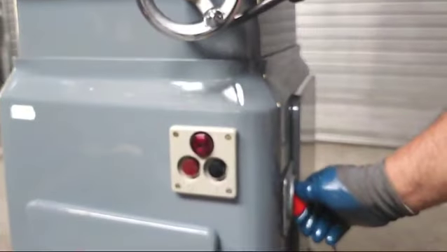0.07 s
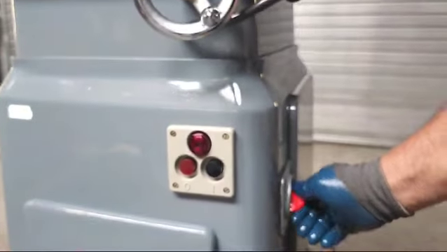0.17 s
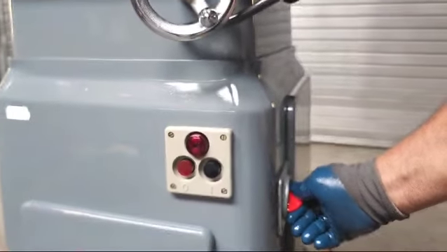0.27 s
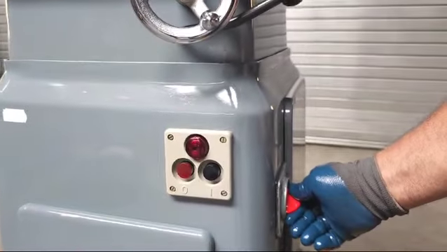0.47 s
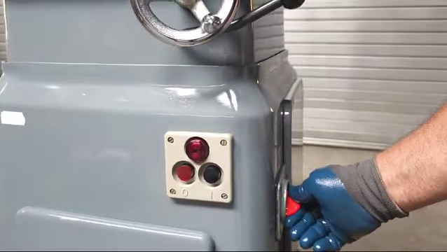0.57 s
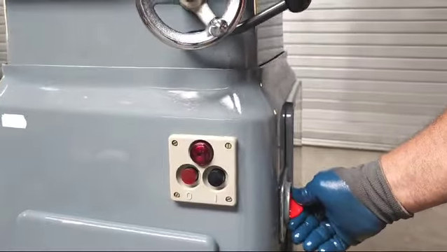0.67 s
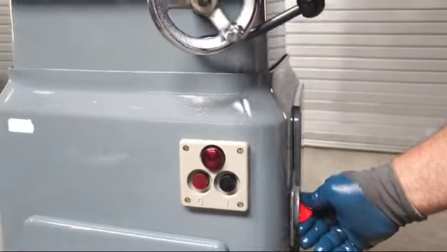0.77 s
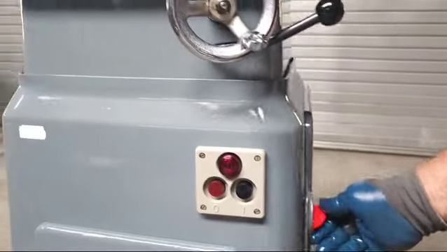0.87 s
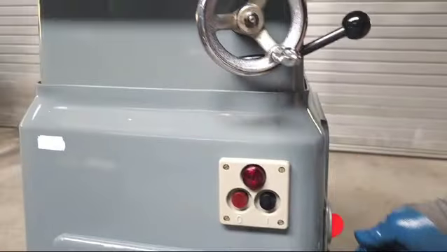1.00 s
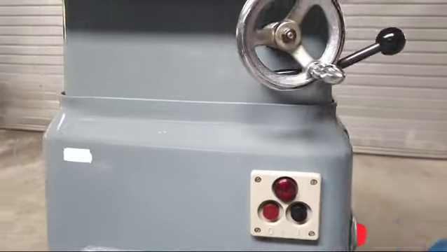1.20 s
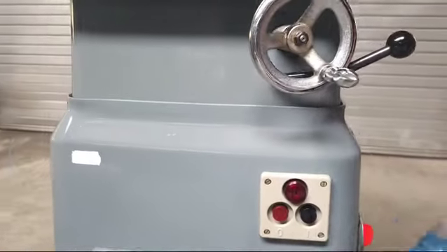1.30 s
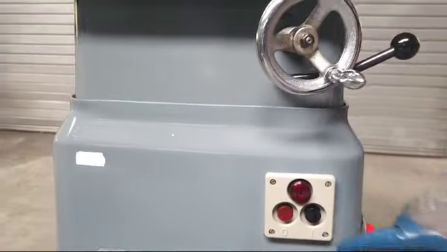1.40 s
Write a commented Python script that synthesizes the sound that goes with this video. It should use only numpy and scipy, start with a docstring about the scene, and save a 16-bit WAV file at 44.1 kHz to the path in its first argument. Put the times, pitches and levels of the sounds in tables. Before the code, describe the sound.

A rotary switch on a steel machine cabinet clacks over sharply, echoing through a bare workshop

```python
"""In a bare, echoing workshop, a rotary switch on a steel machine cabinet snaps over with a sharp clack.
Low rumble, room air and a faint tone fill the hall: shaped noise and a phase-modulated sine.
Mostly to the right, clothing rustles, something ticks and a shoe scuffs: enveloped, filtered noise.
The clack is a burst of blows through housing resonances, with decaying panel modes; noise with a
frequency-dependent decay makes the reverberation."""
import sys
import numpy as np
from scipy import signal
from scipy.fft import rfft, irfft, next_fast_len
from scipy.io import wavfile
from scipy.ndimage import map_coordinates

SR = 44100
rng = np.random.default_rng(int(sys.argv[2]) if len(sys.argv) > 2 else 0)


def linear_from_db(decibels):
    """Turn decibels (scalar or array-like) into linear amplitude factors; 0 gives 1."""
    return 10 ** (np.asarray(decibels, float) / 20)


def put_to_file(sound):
    """Save the sound as 16-bit audio at rate SR, in the file named by the first command-line argument."""
    columns = np.atleast_2d(sound).T  # one column per channel
    safe = np.clip(columns, -1, 1)
    whole_steps = np.round(safe * 32767)
    wavfile.write(sys.argv[1], SR, whole_steps.astype(np.int16))


N = 63945


def unit(x):
    """Normalisation to unit root-mean-square value."""
    return x / np.sqrt(np.mean(x ** 2) + 1e-20)


def along(points, hz):
    """Linear interpolation of (f/Hz, value) points over logarithmic frequency."""
    f, value = np.transpose(points)
    return np.interp(np.log(hz + 1), np.log(f + 1), value)


def level(rows):
    """Amplitude envelope from (t/s, level/dB) rows, practically silent before the first."""
    s, db = np.transpose(rows)
    return linear_from_db(np.interp(np.arange(N) / SR, s, db, left=-150))


def wobble(rate):
    """Slow random fluctuation: a spline through random knots, rate knots a second."""
    knots = rng.standard_normal(int(N * rate / SR) + 4)
    return map_coordinates(knots, [np.arange(N) * rate / SR])


def filtered(x, response):
    """Linear filtering: the spectrum is multiplied by a response of frequency."""
    m = next_fast_len(N + SR // 2)
    return irfft(rfft(x, m) * response(np.fft.rfftfreq(m, 1 / SR)), m)[..., :N]


def resonant(x, peaks):
    """Parallel resonators, each applied twice: a soft start and dark valleys between the peaks."""
    def response(f):
        total = 0
        for centre, width, db in peaks:
            once = 1j * f * width / (centre * centre - f * f + 1j * f * width)
            total = total + linear_from_db(db) * once ** 2
        return total
    return filtered(x, response)


def sides(db):
    """Stereo level difference: left and right gains whose ratio is db."""
    return linear_from_db(np.array([db / 2, -db / 2]))


def grit(grain_db):
    """Friction noise: random noise made of uneven grains."""
    return unit(rng.standard_normal(N) * linear_from_db(grain_db * wobble(400)))


# correlation of the left and right sound in the hall: (f/Hz, likeness 0-1)
LIKENESS = [(60, .996), (130, .985), (290, .92), (640, .5), (1400, .1), (15000, 0)]


def paired(spectrum):
    """Partial coherence: two noises of one spectrum, alike in the bass and independent in the treble."""
    def mid_and_side(hz):
        angle = np.arccos(np.clip(along(LIKENESS, hz), -1, 1)) / 2
        return linear_from_db(along(spectrum, hz)) * [np.cos(angle), np.sin(angle)]
    mid, side = filtered(rng.standard_normal((2, N)), mid_and_side)
    return unit(np.array([mid + side, mid - side]))


# relative spectral density of the low rumble: (f/Hz, level/dB per Hz)
RUMBLE_SPECTRUM = [(12, -39), (20, -31.5), (38, -7), (59, -2), (81, -9), (145, -16.5), (168, -18.5),
                   (216, -19), (300, -40.5), (390, -64.5), (660, -120)]
# course of the rumble: (t/s, level/dB)
RUMBLE_COURSE = [(0.0, -44), (0.156, -39.5), (0.188, -39.5), (0.54, -39.5), (0.552, -40), (0.876, -42),
                 (1.126, -40), (1.21, -45), (1.416, -42.5), (1.45, -50)]


def rumble():
    """Band-shaped noise whose level fluctuates slowly about a set course."""
    return level(RUMBLE_COURSE) * linear_from_db(0.54 * wobble(15)) * paired(RUMBLE_SPECTRUM)


# relative spectral density of the room air: (f/Hz, level/dB)
AIR_SPECTRUM = [(150, -33.5), (250, -5.5), (350, -9.5), (800, -10), (1200, -12), (2000, -17.5), (2600, -28),
                (3800, -29.5), (5000, -32.5), (6000, -39), (7500, -52), (16000, -55.5)]
AIR_DB = -56


def room_air():
    """Broadband noise falling towards the treble, with a slight drift of level."""
    return linear_from_db(AIR_DB + 0.96 * wobble(4.5)) * paired(AIR_SPECTRUM)


# rise and fall of the faint tone: (t/s, level/dB)
WHINE_COURSE = [(0, -69), (.2, -68), (.4, -78), (1.15, -75.5), (1.28, -63), (1.45, -65)]
WHINE_HZ, WHINE_WAVER_RAD = 851, 0.63


def whine():
    """Phase modulation: a faint far tone, its phase wandering separately on each side."""
    waver = WHINE_WAVER_RAD * np.array([wobble(17), wobble(15)])
    tone = np.sin(2 * np.pi * WHINE_HZ * np.arange(N) / SR + waver)
    return level(WHINE_COURSE) * unit(tone)


def background():
    """Superposition of rumble, room air and the faint tone."""
    return rumble() + room_air() + whine()


# reverberation time of the long tail: (f/Hz, t60/s)
HALL_T60 = [(200, 1.1), (600, 1.5), (1400, 1.5), (2500, 1.7), (4000, 1.79), (6000, 1.3), (9000, 0.93),
            (15000, 0.46)]
HALL_RISE_S = 0.0027
NEAR_DB, NEAR_T60_S = 14.5, 0.24  # near walls and floor answer first, over the long tail


def hall(x, colour):
    """Reverberation by convolution with noise in which each frequency dies at its own speed."""
    hz, t, z = signal.stft(paired(colour), SR, nperseg=256)
    long_tail = linear_from_db(-60 * t / along(HALL_T60, hz)[:, None])
    near_answer = linear_from_db(NEAR_DB - 60 * t / NEAR_T60_S)
    rise = 1 - np.exp(-t / HALL_RISE_S)
    tail = signal.istft(z * (long_tail + near_answer) * rise, SR, nperseg=256)[1]
    tail = tail / np.linalg.norm(tail[0])
    return signal.fftconvolve(x[None], tail, axes=1)[:, :N]


# relative colour of the hall's answer to the switch: (f/Hz, level/dB)
HALL_COLOUR = [(150, -19.5), (300, -20.5), (600, -1.5), (1300, -6), (2700, -5.5), (4500, -1), (6200, -3.5),
               (7500, -11), (10500, -17), (12500, -14), (16000, -26)]
HALL_DB, MOVE_WET_DB = -2.5, -11


def echoes(switch_send, movement_send):
    """Linearity of the room: the answers to switch and movement simply add."""
    switch_echo = linear_from_db(HALL_DB) * hall(switch_send, HALL_COLOUR)
    movement_echo = linear_from_db(MOVE_WET_DB) * hall(movement_send, [(1000, 0)])  # flat colour
    return switch_echo + movement_echo


# relative spectral density of cloth, shared by the ticks: (f/Hz, level/dB per Hz)
CLOTH_SPECTRUM = [(1500, 0.5), (4000, 6), (7500, 1), (10300, -9), (11800, -5.5), (14000, -9), (16000, -21)]


def cloth(x):
    """Spectral shaping of noise to the colour of cloth."""
    return unit(filtered(x, lambda hz: linear_from_db(along(CLOTH_SPECTRUM, hz))))


# strength of the rubbing, before the side balance: (t/s, level/dB)
RUSTLE_COURSE = [(.72, -95), (.75, -73), (.796, -60), (.836, -59.5), (.852, -69), (.886, -63.5),
                 (.934, -72.5), (1.02, -80.5), (1.29, -83), (1.312, -62.5), (1.35, -60.5), (1.385, -49.5),
                 (1.42, -54), (1.45, -60)]


def rustle():
    """Dry friction: grainy noise follows the strength of the rubbing."""
    return level(RUSTLE_COURSE) * cloth(grit(grain_db=3.0))


# ticks, before the side balance: (t/s, starting level/dB)
TICK_STARTS = [(0.637, -63), (0.8883, -61), (1.1742, -59)]
TICK_T60_S = 0.0287


def ticks():
    """Impulsive excitation: noise starts at once and decays exponentially."""
    t = np.arange(N) / SR
    envelope = 0
    for s, db in TICK_STARTS:
        decay = linear_from_db(db - 60 * np.maximum(t - s, 0) / TICK_T60_S)
        envelope = envelope + (t > s) * decay
    return cloth(rng.standard_normal(N)) * envelope


# strength of the scuff, before the side balance: (t/s, level/dB)
SCUFF_COURSE = [(1.33, -71), (1.35, -52), (1.365, -45.5), (1.385, -43), (1.408, -50), (1.425, -56),
                (1.45, -58)]
# resonances of the sole on its edge, higher: (f/Hz, width/Hz, relative level/dB)
SOLE_EDGE = [(4420, 1200, -8.5), (5870, 660, -0.5), (7000, 1200, -6), (11880, 3000, -16.5)]
# resonances of the sole once it lies flat, lower: (f/Hz, width/Hz, relative level/dB)
SOLE_FLAT = [(1830, 530, -2), (3500, 680, -1.5), (4730, 990, 1), (7500, 3100, -6.5), (11800, 2700, -10)]
FLAT_FROM_S, FLAT_BY_S = 1.36, 1.405
# resonances of the heel dragging after: (f/Hz, width/Hz, relative level/dB)
HEEL = [(1600, 350, 0), (3550, 800, -3)]
DRAG_FROM_S, DRAG_RISE_S, DRAG_DB = 1.42, 0.0096, -53
GRAIN_DB = 1.8


def scuff():
    """Friction-driven resonance: a sole slides from its edge onto its flat, then the heel drags."""
    t = np.arange(N) / SR
    flat = np.clip((t - FLAT_FROM_S) / (FLAT_BY_S - FLAT_FROM_S), 0, 1)
    on_edge = np.sqrt(1 - flat) * unit(resonant(grit(GRAIN_DB), SOLE_EDGE))
    on_flat = np.sqrt(flat) * unit(resonant(grit(GRAIN_DB), SOLE_FLAT))
    drag_rise = np.clip((t - DRAG_FROM_S) / DRAG_RISE_S, 0, 1)
    drag = linear_from_db(DRAG_DB) * drag_rise * unit(resonant(grit(GRAIN_DB), HEEL))
    return level(SCUFF_COURSE) * (on_edge + on_flat) + drag


# side balance of the movement: (f/Hz, left minus right level/dB)
MOVEMENT_BALANCE = [(1500, 8), (3400, 0.5), (5000, -17), (7500, -5.5), (12000, -17.5)]
RIGHT_LEADS_SAMPLES = 3


def movement():
    """Localisation by time and level difference: rustle, ticks and scuff reach the right first."""
    mono = rustle() + ticks() + scuff()
    pair = np.array([mono, np.roll(mono, -RIGHT_LEADS_SAMPLES)])
    return filtered(pair, lambda hz: sides(along(MOVEMENT_BALANCE, hz)))


# the cam snaps and rebounds: (t/s, relative peak level/dB, left minus right level/dB)
CONTACTS = [(.2376, -22, 8), (.239, -11, -1), (.2395, 0, 0), (.2403, -4, 1), (.2428, -11, -3),
            (.244, -9, -4), (.2472, -13, 5), (.2525, -16, -4)]
SNAP_S = CONTACTS[2][0]  # the hardest contact
BLOW_DB = 15.5
RATTLE_DB, RATTLE_T60_S = -6.5, .035  # chatter after the snap
SLIDE_DB, SLIDE_T60_S = -22, .012  # the cam sliding up to the snap, relative to the chatter
# short resonances of the housing facing the left microphone: (f/Hz, width/Hz, relative level/dB)
HOUSING_LEFT = [(702, 850, -5), (1296, 800, -2), (3750, 1400, 1), (6000, 1100, -1), (8260, 2300, -8),
                (9550, 470, -9.5), (12560, 1100, -4.5)]
# the same facing the right microphone: (f/Hz, width/Hz, relative level/dB)
HOUSING_RIGHT = [(706, 280, -17.5), (1503, 1100, -17), (4340, 1800, -5.5), (5200, 1200, 4),
                 (5770, 420, 2.5), (8100, 1800, -11), (13000, 3500, -13)]


def contact_blows():
    """Impact excitation: contact impulses, sliding and chatter drive the housing's resonances."""
    blows = np.zeros((2, N))
    for s, db, pan_db in CONTACTS:
        blows[:, round(s * SR)] = linear_from_db(db + BLOW_DB) * sides(pan_db)
    t = np.arange(N) / SR - SNAP_S
    course_db = np.where(t > 0, -60 * t / RATTLE_T60_S, SLIDE_DB + 60 * t / SLIDE_T60_S)
    blows += linear_from_db(RATTLE_DB + course_db) * rng.standard_normal((2, N))
    return np.array([resonant(blows[0], HOUSING_LEFT), resonant(blows[1], HOUSING_RIGHT)])


# modes of the cabinet panels: (f/Hz, relative level/dB, t60/s, left minus right level/dB)
PANEL_MODES = [(179, -16, 0.33, 0), (249.4, -13.5, .3, 2), (287, -11.5, .25, 3.5), (486, -16, 0.21, -2),
               (602, -14, 0.38, -4), (709, -14, 0.23, 3), (814.4, -12.5, .12, 1), (1026, -9, .12, 2),
               (1255, -7.5, .12, 6.5), (1506, -12.5, .13, 4), (1838, -4, .11, 16.5), (2159, -5, 0.21, 18.5),
               (4740, -3, .06, -9.5), (5940, -20.5, .05, -6.5), (7440, -6.5, .07, 8.5)]
PANEL_DB, PANEL_RISE_S = -24.5, 0.002
WAVER_DB, WAVER_RAD = 2, .5  # crowded neighbours make each mode waver
PATH_DIFFERENCE_M = 0.059  # extra path to the right microphone


def panel_ring():
    """Modal synthesis: the snap sets the panels' modes ringing as decaying sines."""
    after = np.maximum(np.arange(N) / SR - SNAP_S, 0)
    arrival = after - np.array([[0], [PATH_DIFFERENCE_M / 343]])  # speed of sound 343 m/s
    ring = 0
    for hz, db, t60, pan_db in PANEL_MODES:
        envelope = linear_from_db(PANEL_DB + db - 60 * after / t60 + WAVER_DB * wobble(75.2))
        mode = np.sin(2 * np.pi * hz * arrival + WAVER_RAD * wobble(50))
        ring = ring + sides(pan_db)[:, None] * envelope * mode
    return ring * (1 - np.exp(-after / PANEL_RISE_S))


SNAP_TO_HALL_DB, PANEL_TO_HALL_DB = 9, -16


def switch():
    """Source and excitation: housing and panels sound directly; snap impulse and ring excite the hall."""
    ring = panel_ring()
    direct = contact_blows() + ring
    snap = np.arange(N) == round(SNAP_S * SR)
    send = linear_from_db(SNAP_TO_HALL_DB) * snap + linear_from_db(PANEL_TO_HALL_DB) * ring.mean(axis=0)
    return direct, send


# treble response of the microphone, applied to switch, movement and their echoes: (f/Hz, level/dB)
MIC_TREBLE = [(9900, 0), (10650, -4.5), (11400, 1), (14500, -0.5), (15500, -14.5), (16000, -14.5),
              (16700, -25.5)]


def microphone(x):
    """Transducer frequency response: the treble is uneven and its top is weakened."""
    return filtered(x, lambda hz: linear_from_db(along(MIC_TREBLE, hz)))


def scene():
    """Superposition of direct sound and reverberation, through the treble response, and background."""
    clack, switch_send = switch()
    person = movement()
    echo = echoes(switch_send, person[1])
    return microphone(clack + person + echo) + background()


def top_cut(x):
    """Nothing passes above the cut-off."""
    return signal.sosfilt(signal.butter(12, 16680, fs=SR, output="sos"), x)


CEILING, KNEE = .95, 6  # largest amplitude; exponent, higher bends later


def record(dry):
    """Soft limiting: the highest peaks are rounded off below a ceiling."""
    mix = dry / (1 + np.abs(dry / CEILING) ** KNEE) ** (1 / KNEE)
    return top_cut(mix)


dry = scene()
out = record(dry)
put_to_file(out)
```